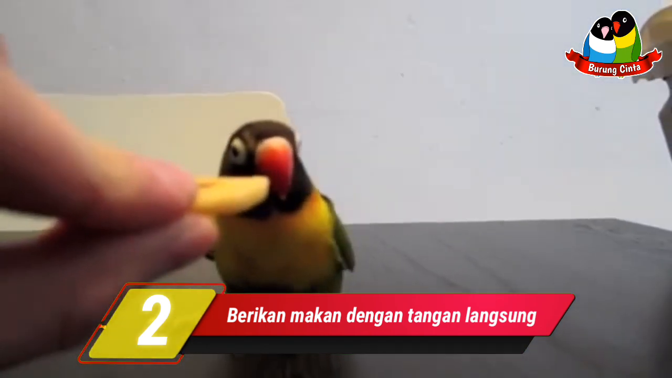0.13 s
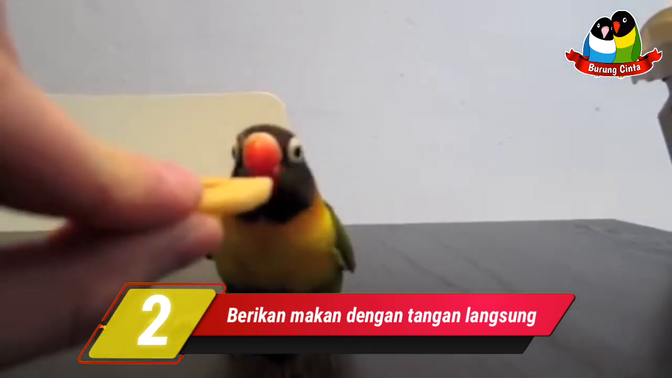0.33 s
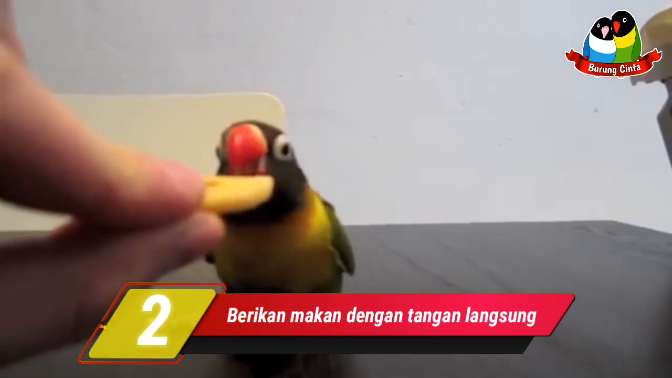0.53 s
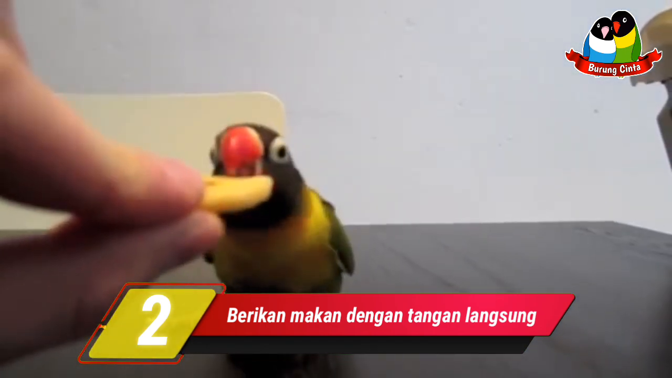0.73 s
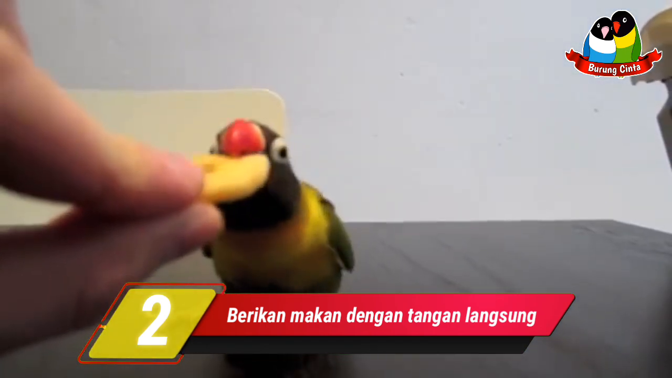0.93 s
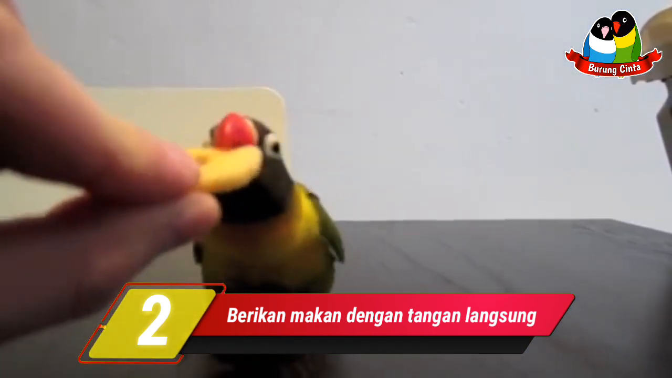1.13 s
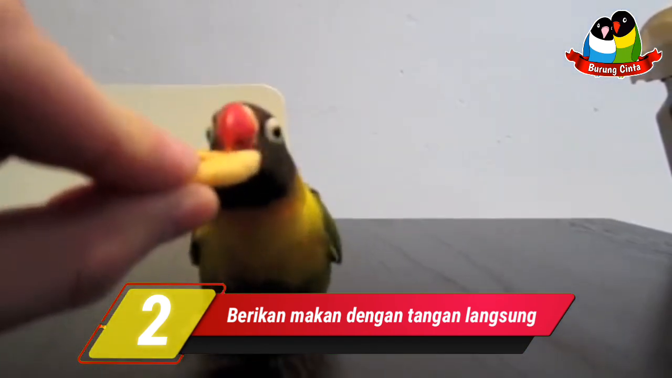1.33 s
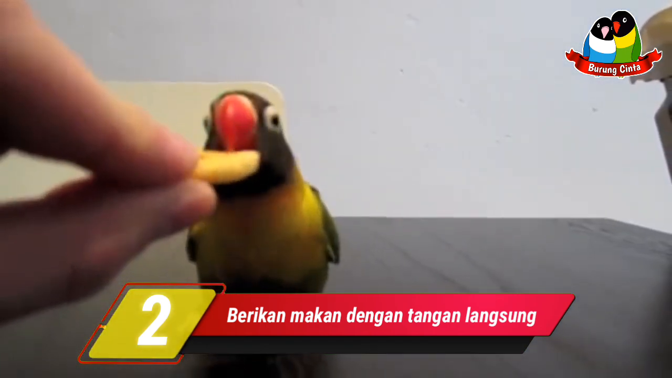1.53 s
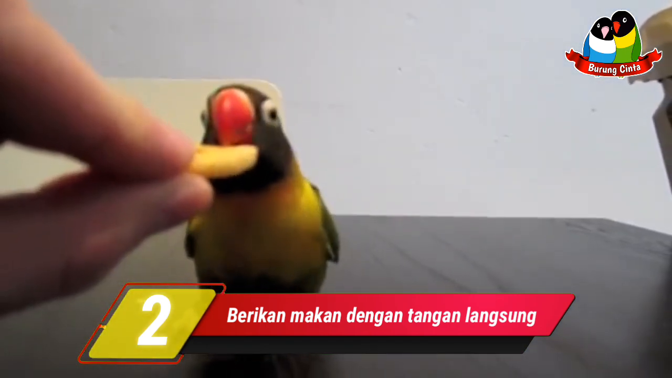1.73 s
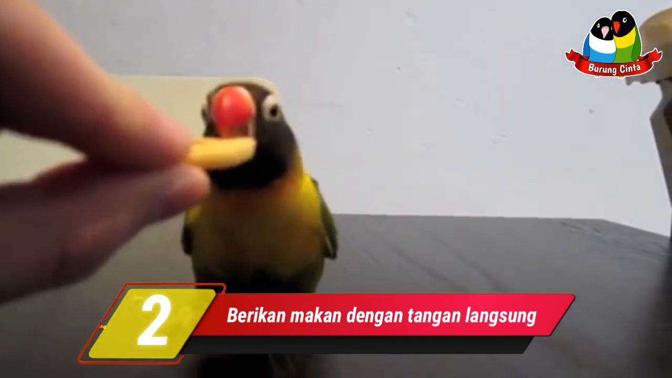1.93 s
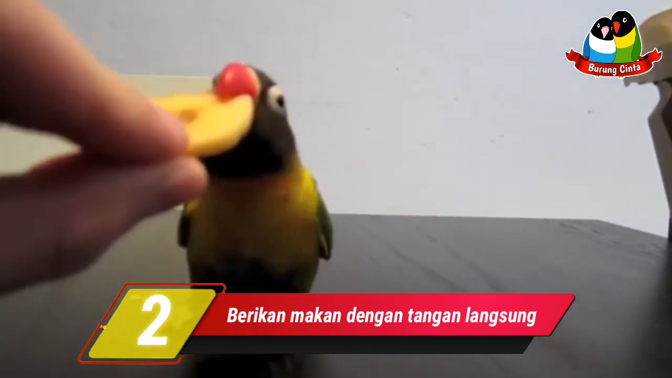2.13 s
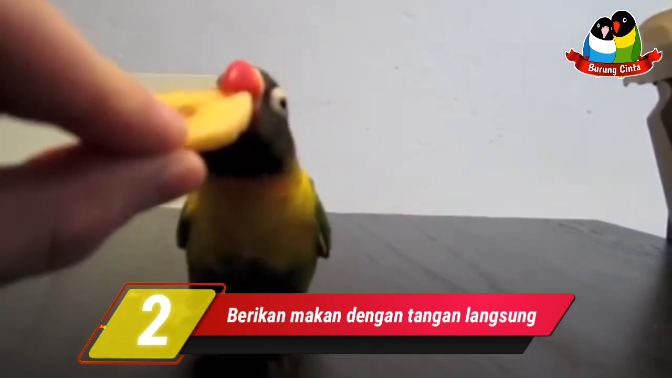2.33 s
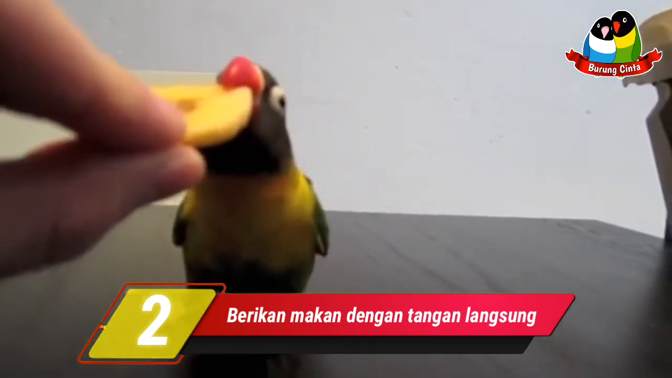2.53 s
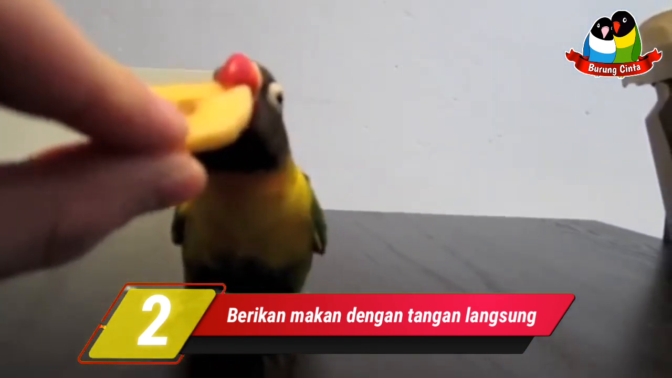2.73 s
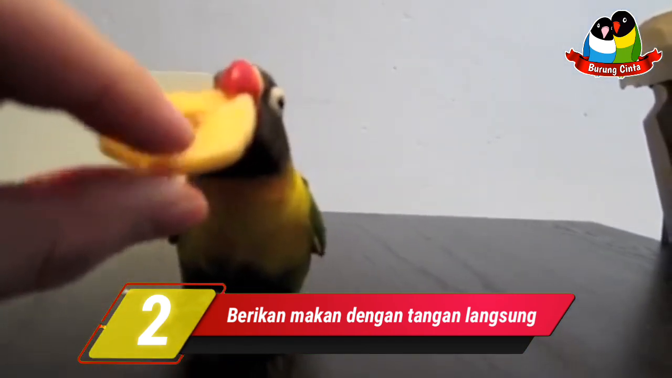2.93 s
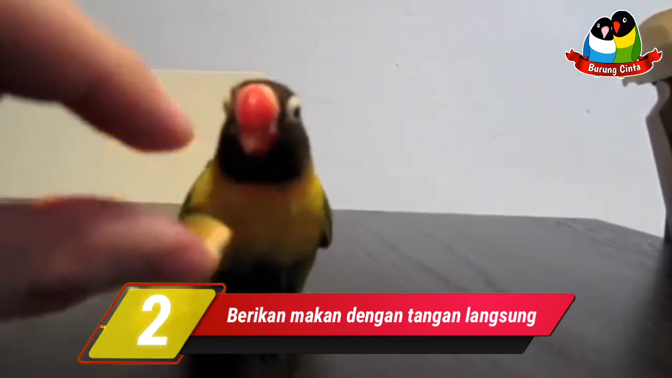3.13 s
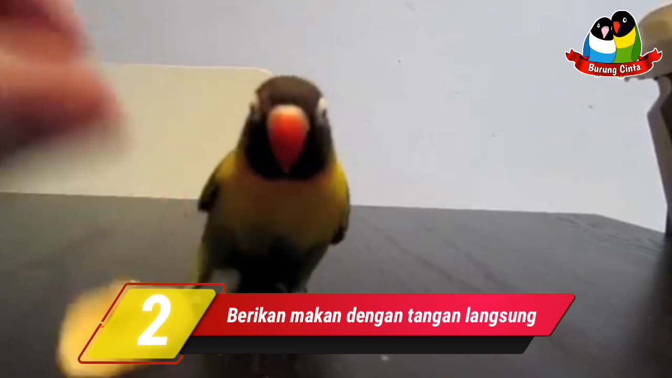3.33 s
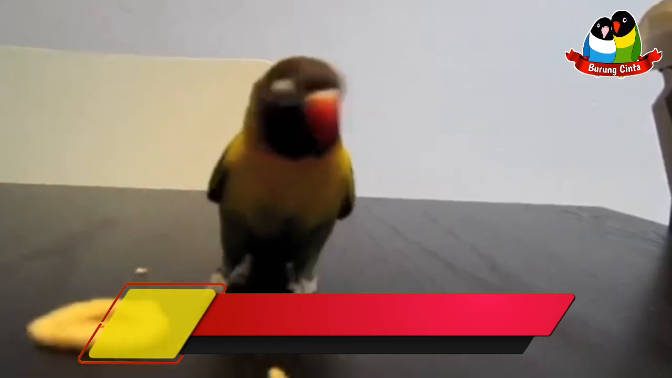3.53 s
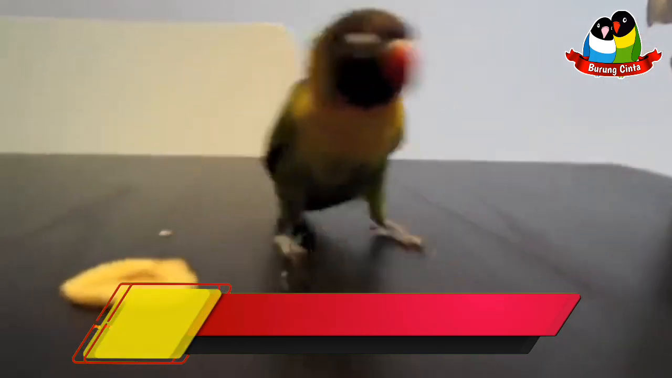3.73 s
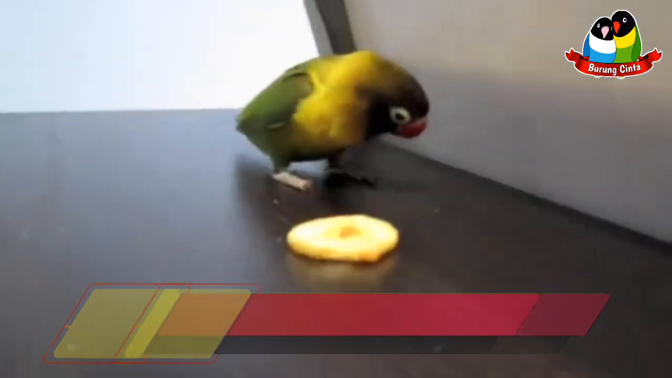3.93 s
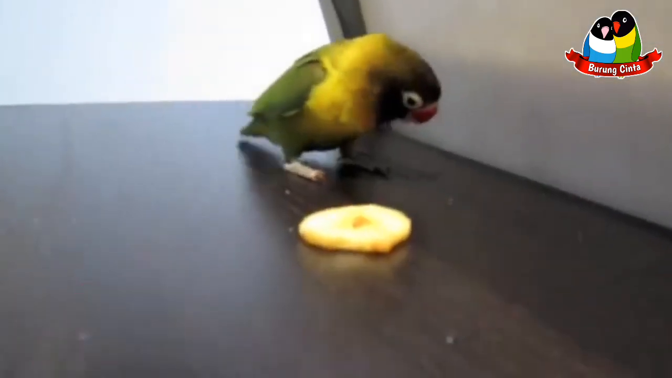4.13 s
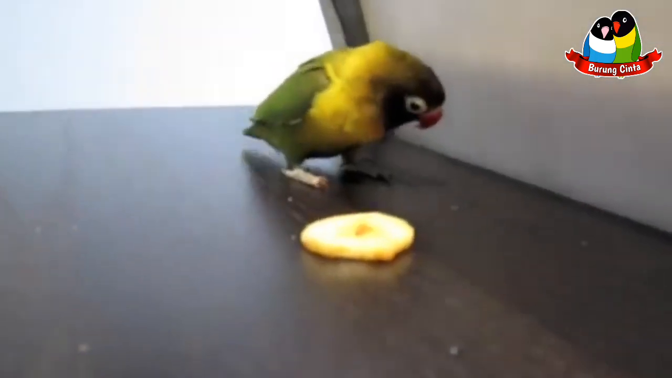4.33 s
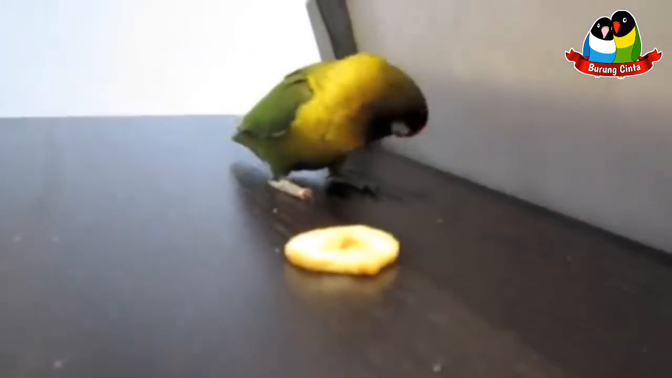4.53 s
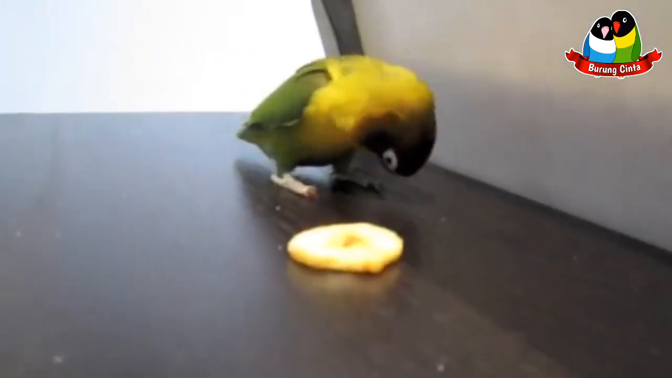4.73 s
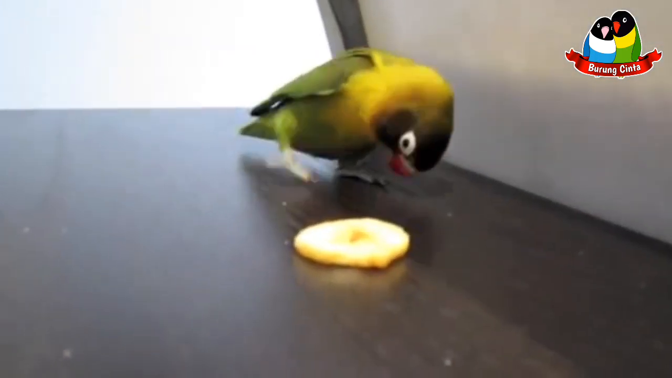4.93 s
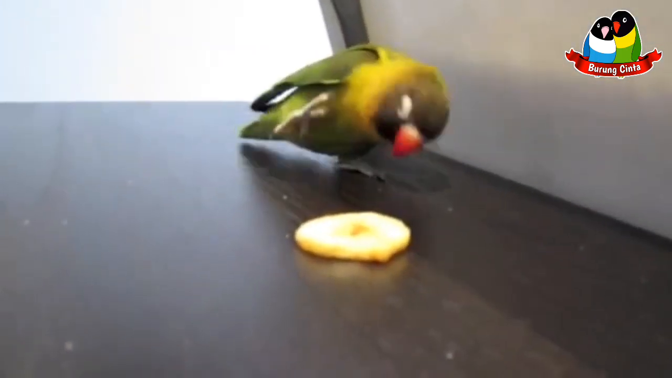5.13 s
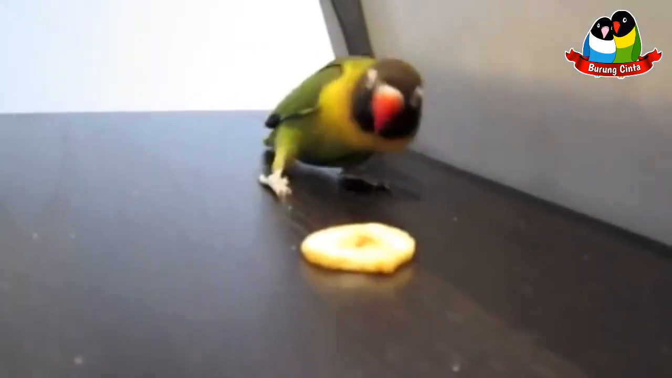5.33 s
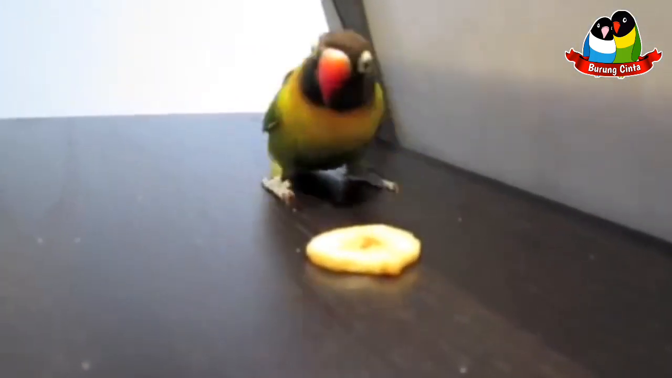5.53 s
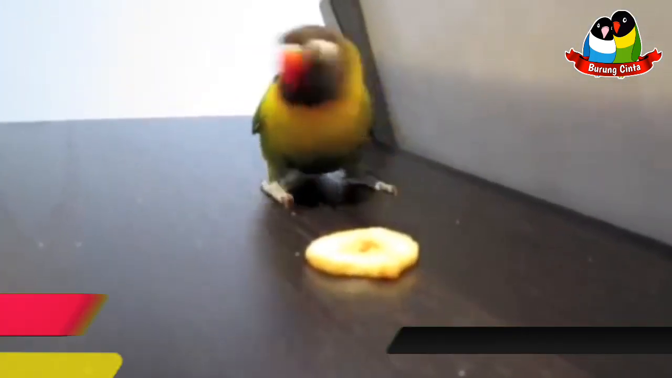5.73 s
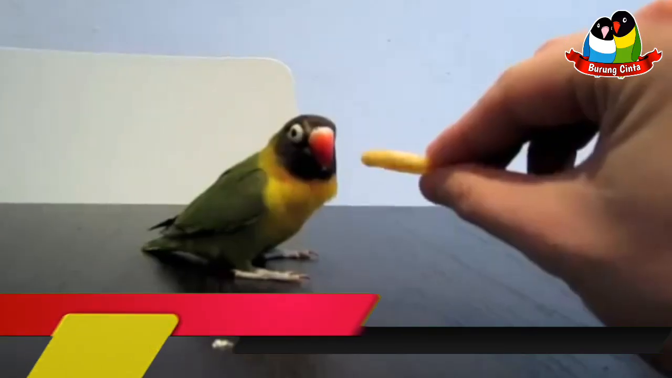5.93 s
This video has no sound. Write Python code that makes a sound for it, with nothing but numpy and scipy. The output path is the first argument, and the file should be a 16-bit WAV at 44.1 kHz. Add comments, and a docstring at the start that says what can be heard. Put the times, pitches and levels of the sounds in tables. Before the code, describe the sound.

A lovebird nibbles a dry biscuit close to the microphone in a small, hard-walled room, over faint air noise and electrical hum. For the first three seconds there are quiet, irregular crackles and crisp little clicks, with light beak scrapes and a soft bump near 2.8 seconds. At 3.1 seconds the biscuit snaps sharply, hits the table with a loud tap and rattles to rest by about 3.6 seconds. At 4.2 seconds the bird gives one loud, high, very quick two-note chirp, harsh and then pure. Both the clatter and the chirp leave a short room echo. From there to about 5.6 seconds the bird shuffles, with soft foot taps, claw scrapes and feather rustles, while two very faint, distant peeps sound around 5 seconds. The sound dips briefly to silence at 3.9 and 5.9 seconds.

```python
"""A small, hard room, the microphone close to a lovebird nibbling a dry ring biscuit held in fingers.
Brittle fractures crackle in its beak until the biscuit snaps free, drops on the table and rattles
to rest. The bird gives one two-note chirp, harsh and then pure, and shuffles about.
Behind it are room tone, mains hum and two far peeps. Twice the level dips briefly to silence."""
import sys
import numpy as np
from scipy import signal
from scipy.fft import rfft, irfft, next_fast_len
from scipy.io import wavfile
from scipy.ndimage import uniform_filter1d

SR = 44100
rng = np.random.default_rng(int(sys.argv[2]) if len(sys.argv) > 2 else 0)


def int16_out(signal):
    """Quantize to a 16-bit WAV file."""
    q = np.round(np.clip(np.atleast_2d(signal).T, -1, 1) * 32767)
    wavfile.write(sys.argv[1], SR, q.astype(np.int16))


N = 267687

# modes of the biscuit: (frequency [Hz], level [dB], t60 [s])
BISCUIT_MODES = [(695, -8.5, 0.023), (1054, -5, 0.029), (1627, 1.5, 0.0077), (1820, -1, 0.011),
                 (2480, 4.5, 0.0055), (2727, 0, 0.013), (2900, -2, 0.0055), (4255, 3, 0.0057),
                 (4960, -8.5, 0.003), (5620, -3, 0.0068)]
# spectrum of a brittle fracture: (frequency [Hz], gain [dB])
CRACK_COLOUR = [(150, -20), (450, -15.5), (1000, -4), (2300, 2.5), (3700, -4.5), (5400, -1), (8000, -8.5),
                (10000, -11.5), (12500, -13.5), (16000, -26.5)]


def amp(db):
    """Decibels to gain."""
    return 10 ** (np.asarray(db) / 20)


def unit(x):
    """Scale to rms 1."""
    return x / np.sqrt(np.mean(x ** 2) + 1e-20)


def along(points, hz):
    """Read (frequency, value) points on a log axis."""
    f, v = np.transpose(points)
    return np.interp(np.log(hz + 1), np.log(f + 1), v)


def bell(hz, centre_hz, octaves):
    """A bell curve on the log-frequency axis, 1 at its centre."""
    return np.exp(-.5 * (np.log2((hz + 1) / centre_hz) / octaves) ** 2)


def shelves(hz, body_db, edge_db):
    """A contact's own colour in dB: extra knock below, extra edge above."""
    return along([(800, body_db), (1400, 0), (3300, 0.005), (4800, edge_db)], hz)


def filtered(x, response):
    """Zero-phase filter with gain response(hz)."""
    size = next_fast_len(len(x) + SR // 4)
    return irfft(rfft(x, size) * response(np.fft.rfftfreq(size, 1 / SR)), size)[:len(x)]


def coloured(x, gain_db, size=2048):
    """Causal filter with the given dB curve, so that attacks stay sharp."""
    cepstrum = irfft(np.log(amp(gain_db(np.fft.rfftfreq(size, 1 / SR)))))
    cepstrum[1:size // 2] *= 2
    cepstrum[size // 2 + 1:] = 0
    return signal.fftconvolve(x, irfft(np.exp(rfft(cepstrum))))[:len(x)]


def add(track, s, sound, db):
    """Lay a sound into the track at time s, with the energy of 3 ms at the given level."""
    part = track[round(s * SR):][:len(sound)]
    part += amp(db) * sound[:len(part)] / np.sqrt(np.sum(sound ** 2) / (.003 * SR))


def ring(modes, t):
    """Damped modes, struck a little differently each time."""
    chance = rng.standard_normal((len(modes), 2)) * [2, .025]
    return sum((-1) ** k * amp(db + vary_db - 60 * t / t60) * np.cos(2 * np.pi * hz * (1 + detune) * t)
               for k, ((hz, db, t60), (vary_db, detune)) in enumerate(zip(modes, chance)))


def swell(s, db, half_s, centre_hz, octaves, uneven_db=8.5):
    """A short swell of tiny uneven impulses in one band."""
    out, t = np.zeros(N), np.arange(N) / SR
    active = np.abs(t - s) < 3 * half_s
    slip, strength = rng.standard_normal((2, N))[:, active]
    band = filtered(slip * amp(uneven_db * strength), lambda hz: bell(hz, centre_hz, octaves))
    out[active] = amp(db) * unit(band) * np.exp(-.5 * ((t[active] - s) / half_s) ** 2)
    return out


def room_tone(hum_hz=59.6, hum_db=-8, waver_db=3.5):
    """The bed: air noise over a low rumble and a faint, wavering mains hum; together they sink for a while
    after the loudest sounds."""
    # spectrum of the air: (frequency [Hz], relative density [dB])
    air_colour = [(12, -32), (20, 7), (56, -4), (177, -9), (542, -13), (678, -15), (780, -17), (1220, -19),
                  (1910, -22), (2140, -23.5), (2320, -23.5), (3630, -25.5), (12800, -38.5), (14700, -44.5),
                  (16000, -67)]
    # level of the whole bed, lower for a while after loud sounds: (time [s], level [dB])
    drift = [(0, -54), (.6, -56), (3.1, -56), (3.25, -63), (3.8, -56.5), (3.95, -54.5), (4.2, -54.5),
             (4.3, -59.5), (4.7, -55), (5.3, -52.5), (6.07, -57.5)]
    t = np.arange(N) / SR
    air = unit(filtered(rng.standard_normal(N), lambda hz: amp(along(air_colour, hz))))
    waver = unit(filtered(rng.standard_normal(N), lambda hz: hz < 6))
    hum = np.sqrt(2) * amp(hum_db + waver_db * waver) * np.sin(2 * np.pi * hum_hz * t)
    return amp(np.interp(t, *np.transpose(drift))) * (air + hum)


def room(x):
    """Bare walls answer with a long diffuse tail whose treble dies first."""
    # decay of the tail: (frequency [Hz], t60 [s])
    decay = [(150, 1), (700, 0.89), (2000, 0.9), (4200, 0.69), (8000, 0.58), (14000, 0.324)]
    # spectrum at its start: (frequency [Hz], gain [dB])
    tail_colour = [(100, 2.5), (700, 7.5), (2000, 2), (4000, -1.5), (6000, 0), (9000, -2), (15000, -15.5)]
    hz, t, noise = signal.stft(rng.standard_normal(SR), SR, nperseg=256)
    shape_db = along(tail_colour, hz)[:, None] - 60 * t / along(decay, hz)[:, None]
    build_up = 1 - np.exp(-t / 0.0013)
    tail = signal.istft(noise * amp(shape_db) * build_up, SR, nperseg=256)[1]
    return signal.fftconvolve(x, tail / np.linalg.norm(tail))[:N]


def wall_echoes(x):
    """Nearby walls send delayed copies back to the microphone."""
    # early reflections: (delay [s], gain [dB])
    reflections = [(0.012, -16.5), (0.041, -28), (.06, -26.5)]
    return sum(amp(db) * np.pad(x, (round(delay * SR), 0))[:N] for delay, db in reflections)


def peeps():
    """Far from the microphone, two faint peeps arrive blurred into a narrow band."""
    # distant calls: (time [s], level [dB])
    calls = [(4.851, -65), (5.09, -61)]
    return sum(swell(s, db, half_s=0.032, centre_hz=3850, octaves=0.15) for s, db in calls)


def rubbing():
    """Close by, soft things rub slowly and dully, horn briefly and brightly."""
    # fingers and feathers: (time [s], half length [s], level [dB])
    rustles = [(0.168, 0.04, -57.5), (0.354, 0.063, -61), (5.06, 0.063, -59.5), (5.392, 0.049, -58.5)]
    # beak and claws: (time [s], level [dB])
    scrapes = [(.172, -66), (.37, -66.5), (1.094, -60), (1.178, -56), (2.135, -67), (3.745, -61),
               (5.005, -63), (5.366, -60)]
    soft = sum(swell(s, db, half_s, centre_hz=1300, octaves=0.97) for s, half_s, db in rustles)
    horn = sum(swell(s, db, half_s=.01, centre_hz=7200, octaves=0.91) for s, db in scrapes)
    return soft + horn


def bumps():
    """Soft contacts stir the low modes of the table top."""
    # hand, feet and the landing biscuit: (time [s], level [dB], brightness [Hz])
    touches = [(2.264, -47, 250), (2.7664, -34, 760), (3.1946, -28, 750), (4.176, -50, 1100),
               (4.1915, -39, 1154), (4.774, -48.5, 2000), (4.784, -45, 2000), (5.592, -41.5, 698),
               (5.606, -41.5, 497)]
    # modes of the table top: (frequency [Hz], level [dB], t60 [s])
    table_modes = [(122, 1, 0.026), (230, -2, .04), (413, -8.5, 0.029), (814, -2.5, 0.024),
                   (1095, -2, 0.028), (1792, -6, 0.0066)]
    # a padded contact: (frequency over brightness [ratio], gain [dB])
    padding = [(.05, 8.5), (.2, 10), (1, 14), (2, -11.5), (6, -53)]
    out, t = np.zeros(N), np.arange(SR // 10) / SR
    for s, db, bright_hz in touches:
        contact = ring(table_modes, t) + amp(5.5 - 60 * t / 0.037) * rng.standard_normal(len(t))
        add(out, s, coloured(contact, lambda hz: along(padding, hz / bright_hz)), db)
    return out


def fracture(crumble_db=-18.5, t60_s=0.01):
    """One sharp break, then a few milliseconds of uneven crumbling."""
    t = np.arange(SR // 20) / SR
    force = amp(crumble_db - 60 * t / t60_s) * rng.standard_normal(len(t)) * rng.exponential(size=len(t))
    force[0] = 1
    return force


def crumbs(per_s=69):
    """As the beak grinds, tiny fractures come at random, most of them weak."""
    # spells of gnawing: (start [s], end [s], level before colouring [dB])
    gnawing = [(0.064, .4, -69), (1.297, 1.42, -63.5), (1.481, 1.73, -66), (1.848, 2.16, -64),
               (2.381, 2.44, -64)]
    out = np.zeros(N)
    for start, end, db in gnawing:
        lateness, sizes = rng.random((2, 40))
        times = start + (np.arange(len(lateness)) + lateness) / per_s
        for s, size in zip(times, sizes):
            crumb = fracture()
            if s < end:
                add(out, s, crumb, db + 8 * size ** 2)
    lift = [(1200, 12.0), (6500, 6.5), (10000, 1)]  # (frequency [Hz], gain [dB])
    return coloured(out, lambda hz: along(CRACK_COLOUR, hz) + along(lift, hz))


def bites(ring_db=-34):
    """Each bite is a fracture that rings the held biscuit a little; smaller splinters sound higher."""
    # the loudest crack frees the biscuit: (time [s], level [dB], splinter band [Hz], band boost [dB])
    cracks = [(0.0303, -50, 8800, 6), (0.0582, -43.5, 1500, 10), (0.0607, -39.5, 10200, 13),
              (0.2645, -45, 2600, 7), (0.278, -48, 1100, 12), (0.2801, -40, 10000, 7),
              (.374, -50.5, 1700, 24), (0.641, -51.5, 5500, -6), (0.8423, -52.5, 6000, 8),
              (0.9316, -42.5, 4600, 12.5), (1.0854, -52.5, 11000, -8), (1.6904, -47.5, 2300, 3.5),
              (1.6984, -54, 2200, 12), (1.71, -55, 5500, 3), (1.9346, -48, 3900, 3),
              (2.0118, -51, 2970, 10), (2.0492, -47.5, 3000, 3), (2.0702, -37.5, 4860, 9.5),
              (2.129, -50.5, 9900, 20), (2.409, -47.5, 3000, 5), (2.986, -43.5, 1080, 8.5),
              (3.1167, -30.5, 13700, 9.5), (3.122, -39, 5500, 2), (3.1355, -17, 1513, 2),
              (3.9378, -49, 2000, -1), (4.0447, -49, 1190, 12), (4.196, -38, 5510, 2)]
    out = np.zeros(N)
    for s, db, splinter_hz, splinter_db in cracks:
        force = fracture()
        crack = force + amp(ring_db) * ring(BISCUIT_MODES, np.arange(len(force)) / SR)
        body_db = 6.5 - 0.21 * splinter_db  # more splinter, less knock
        colour = lambda hz: (along(CRACK_COLOUR, hz) + shelves(hz, body_db, 0)
                             + splinter_db * bell(hz, splinter_hz, octaves=0.56))
        add(out, s, coloured(crack, colour), db)
    return out


def rocking(start_s=3.39, end_s=3.62, per_s=24, level_db=-38, edge_db=-1.5, scatter_db=3):
    """Light, uneven contacts of the wobbling rim, as rows (time [s], level [dB], edge [dB])."""
    lateness, lightness, dullness = rng.standard_normal((3, 24))
    times = start_s + (np.arange(len(lateness)) + .5 + 0.18 * lateness) / per_s
    rows = np.transpose([times, level_db - scatter_db * lightness, edge_db - scatter_db * dullness])
    return list(rows[times < end_s])


def bounces():
    """The biscuit hits the table with a tap, grit and a brief ring; dull when flat, bright on the rim."""
    # the landing and main bounces: (time [s], level [dB], edge [dB])
    impacts = [(3.1945, -12, -5), (3.2947, -24.5, 9), (3.3023, -25.5, 5), (3.312, -34, -4),
               (3.3198, -25, -4), (3.3561, -28, -4), (3.3852, -35, -7.5), (3.4337, -27.5, -3),
               (3.4444, -25, 7.5), (3.472, -31.5, 1), (3.511, -28.5, 8.5), (3.5224, -20.5, 5.5),
               (3.5334, -32.5, 5), (3.5571, -32.5, -5.5), (3.5749, -29.5, 9), (3.6053, -30.5, -7),
               (3.6225, -34, -3.5)]
    # spectrum of a dry, light contact: (frequency [Hz], gain [dB])
    tap_colour = [(60, -3.5), (200, 2), (450, 2.5), (700, 0), (1100, 2), (3200, 3), (4500, -3), (6000, 0.5),
                  (8000, -16), (12000, -17), (16000, -32.5)]
    out, t = np.zeros(N), np.arange(SR // 15) / SR
    landing_db = impacts[0][1]
    for s, db, edge_db in impacts + rocking():
        contact = ring(BISCUIT_MODES, t)
        contact += amp(1 - 60 * t / .009) * rng.standard_normal(len(t))  # grit
        contact[0] += amp(15)  # tap
        body_db = 0.5 - 0.22 * (landing_db - db)  # lighter contacts knock less
        add(out, s, coloured(contact, lambda hz: along(tap_colour, hz) + shelves(hz, body_db, edge_db)), db)
    return out


def note(contour, jitter=0.0021, sideband=0.65):
    """A whistle whose overtones and rasp grow together; harsh while the syrinx locks into slower cycles."""
    # period locks: (start [s], end [s], cycles per period [count], depth [ratio])
    locks = [(4.2135, 4.2255, 3, .65), (4.229, 4.238, 2, .3)]
    t = np.arange(N) / SR
    times, pitch_hz, db, second = np.transpose(contour)
    second_db = np.interp(t, times, second)
    third_db = -26.5 + 0.34 * second_db
    waver = unit(uniform_filter1d(rng.standard_normal(N), size=24))
    phase = 2 * np.pi * np.cumsum(np.interp(t, times, pitch_hz) * (1 + jitter * waver)) / SR
    whistle = np.sin(phase) + amp(second_db) * np.sin(2 * phase) + amp(third_db) * np.sin(3 * phase)
    beat = np.ones(N)
    for start, end, cycles, depth in locks:
        gate = uniform_filter1d(((t > start) & (t < end)) * 1., size=90)
        subharmonics = np.cos(phase / cycles) + (cycles > 2) * sideband * np.cos(2 * phase / cycles)
        beat += gate * depth * subharmonics
    rasp_colour = [(800, -10.0), (4500, -2.5), (14000, -12.0)]  # (frequency [Hz], gain [dB])
    rasp = unit(filtered(rng.standard_normal(N), lambda hz: amp(along(rasp_colour, hz))))
    onset_puff = amp(-5 - 60 * np.abs(t - times[0]) / 0.023)
    turbulence = onset_puff + amp(np.minimum(second_db - 14, -26.5))
    level = np.sqrt(2) * amp(np.interp(t, times, db, left=-120, right=-120))
    return level * (beat * whistle + turbulence * rasp)


def chirp():
    """Two quick notes, one harsh and one pure, leave the open beak near the microphone."""
    # each note at the syrinx: (time [s], pitch [Hz], level [dB], second harmonic re fundamental [dB])
    contours = [
        [(4.2104, 6370, -37, -9.5), (4.2123, 4540, -13, -15.5), (4.216, 4585, -18, -14),
         (4.228, 4425, -20, -8.5), (4.239, 4680, -21, -17), (4.243, 4570, -16, -22.5),
         (4.246, 4100, -31.5, -15), (4.252, 3520, -47, -27)],
        [(4.2715, 4110, -53, -14), (4.2745, 4100, -32, -8.5), (4.285, 3978, -22.5, -28.5),
         (4.306, 4011, -21.5, -23), (4.312, 4220, -35, -1.5), (4.3185, 4170, -40.5, 9.5),
         (4.321, 4150, -65, -8)],
    ]
    # what throat and beak let out: (frequency [Hz], gain [dB])
    beak_colour = [(1500, -6.5), (2200, -2.5), (3000, 1), (9000, 0), (13500, 3.5), (14500, -20)]
    return filtered(sum(note(contour) for contour in contours), lambda hz: amp(along(beak_colour, hz)))


def scene():
    """The nibbling is closest to the microphone and driest; the clatter and the chirp fill the room."""
    near = bites() + crumbs() + rubbing() + bumps()
    clatter, call = bounces(), chirp()
    tails = amp(-21.5) * room(near) + amp(-14.5) * room(clatter) + amp(-20.5) * room(call)
    return (near + clatter + call + tails + wall_echoes(call) + peeps() + room_tone())[None]


def record(dry, ceiling=.56, top_hz=15200):
    """One channel: peaks are rounded off, the level dips briefly twice, and the top is cut."""
    # dips to silence: (time [s], fade-out [s], fade-in [s])
    dips = [(3.899, 0.072, 0.046), (5.898, 0.083, 0.057)]
    t = np.arange(N) / SR
    x = dry[0] / (1 + np.abs(dry[0] / ceiling) ** 6) ** (1 / 6)
    for s, fade_out, fade_in in dips:
        x = x * np.clip(np.maximum((s - t) / fade_out, (t - s) / fade_in), 0, 1)
    return filtered(x, lambda hz: 1 / np.sqrt(1 + (hz / top_hz) ** 90))[None]


dry = scene()
out = record(dry)
int16_out(out)
```